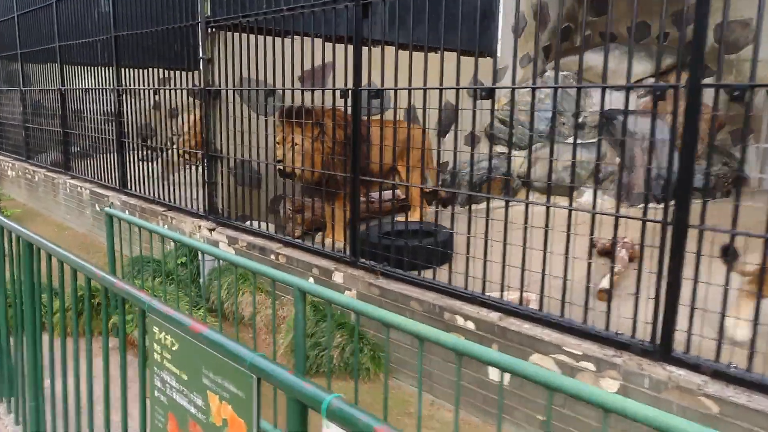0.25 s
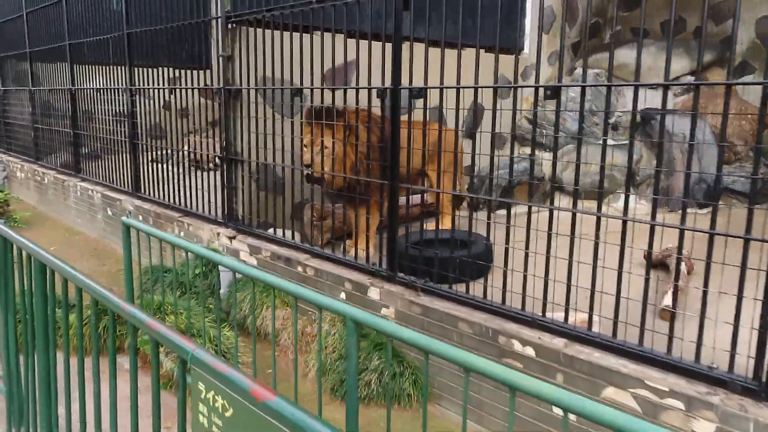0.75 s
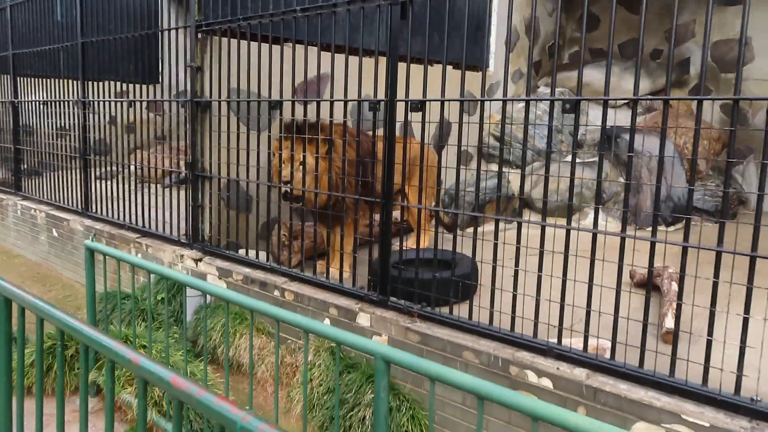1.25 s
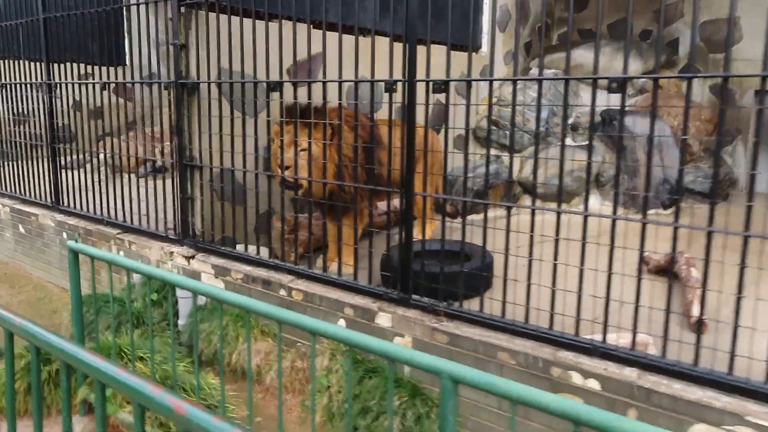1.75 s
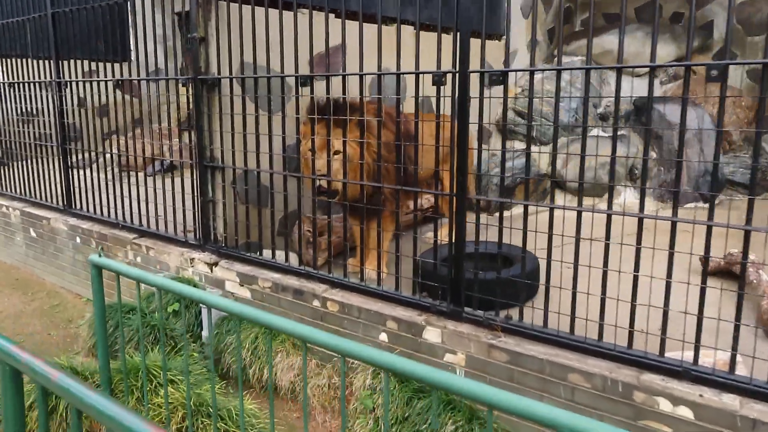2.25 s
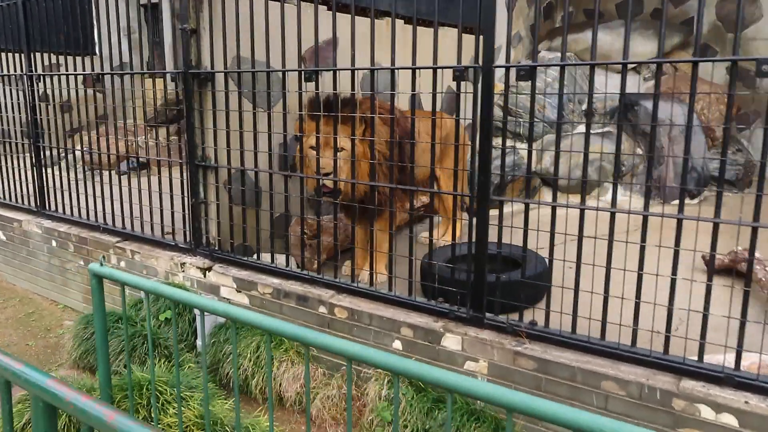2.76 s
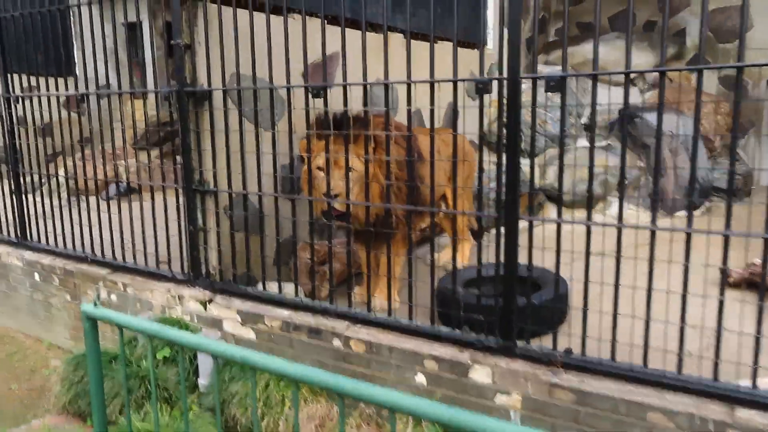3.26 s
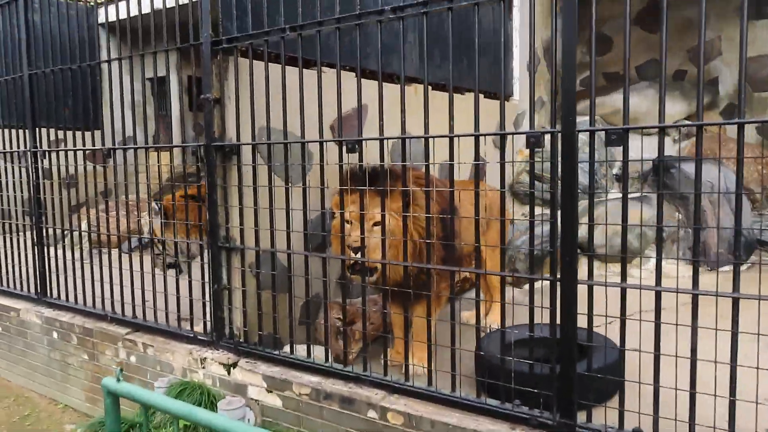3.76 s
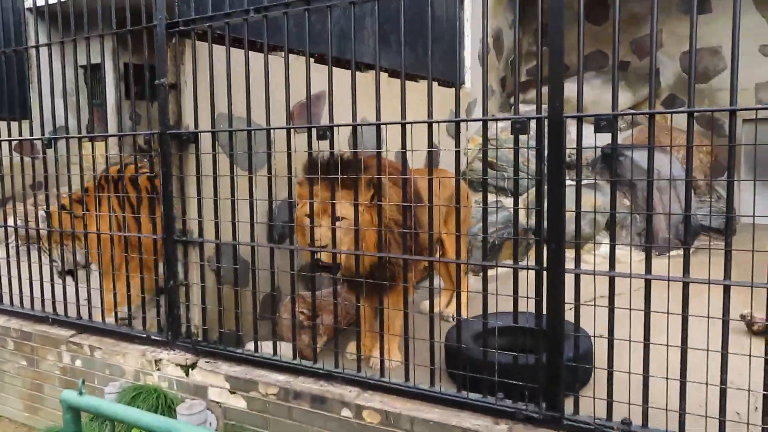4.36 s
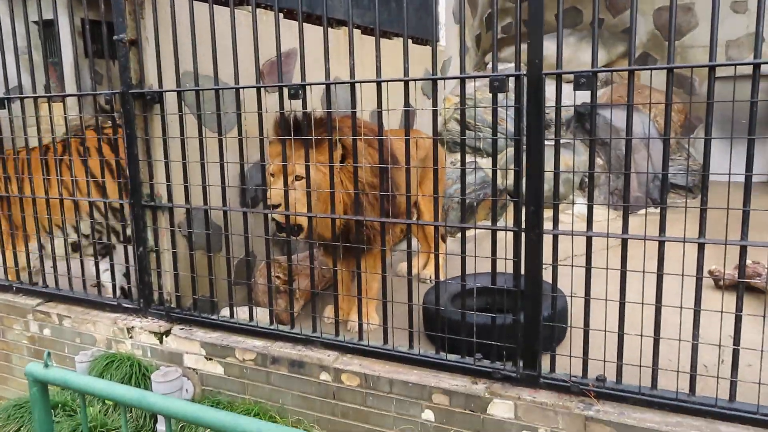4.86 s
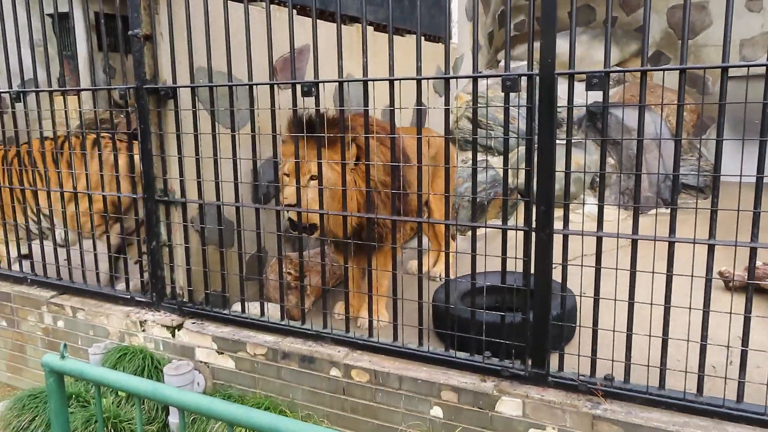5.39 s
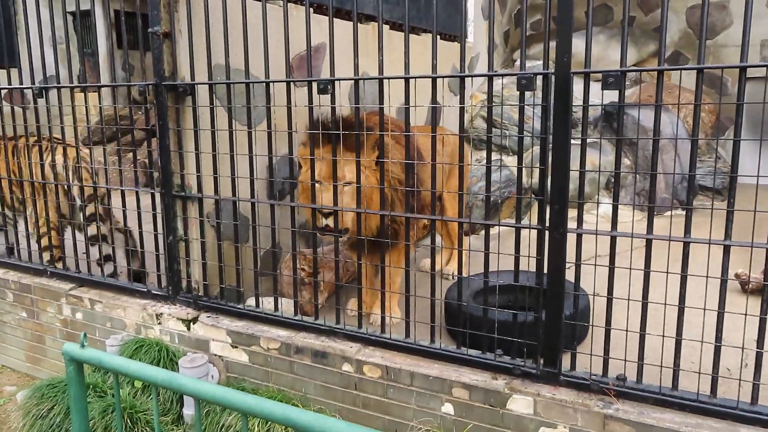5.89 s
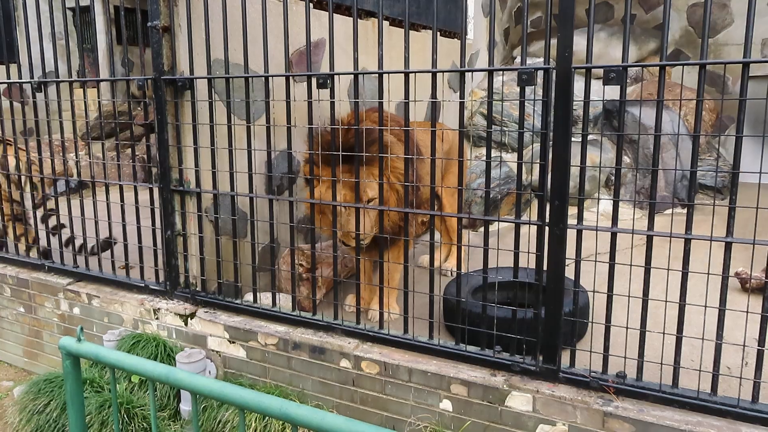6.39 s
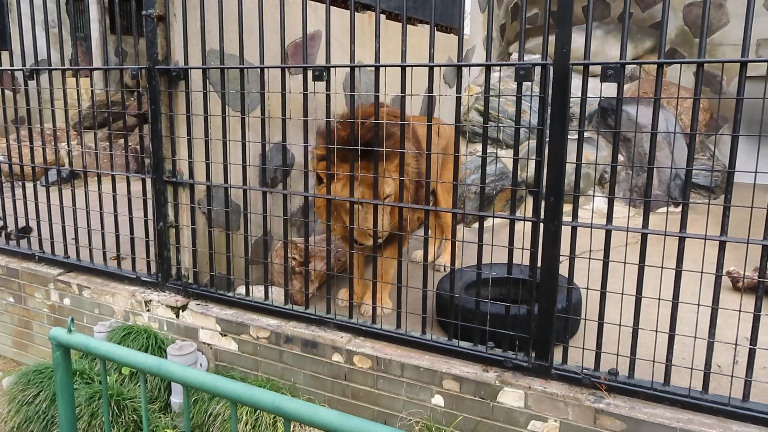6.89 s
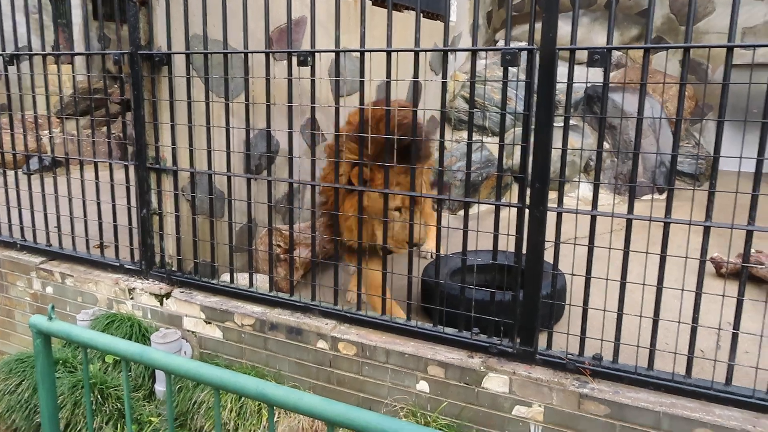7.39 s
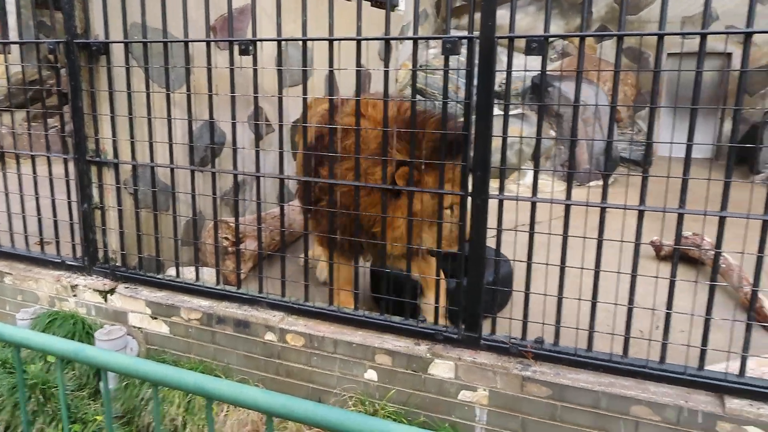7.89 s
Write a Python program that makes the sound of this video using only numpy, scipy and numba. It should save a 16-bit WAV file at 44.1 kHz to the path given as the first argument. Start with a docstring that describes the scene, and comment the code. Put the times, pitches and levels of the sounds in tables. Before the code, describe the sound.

Outdoors at a barred concrete enclosure, a big male lion sends out four separate low grunts, each swelling fast, rattling in the throat and closing in breath. Gritty footsteps scrape and tick right by the stereo microphone between the calls, strongest midway. Distant birds chirp thinly late on, and a rush of air rises over a dull urban rumble toward the end.

```python
"""As an earlier grunt dies away, a lion grunts four times in a concrete pen open to the air.
Deep fold pulses, broken up by a slower flap, ring a long throat; chest, mouth and breath sound with it.
Feet crunch on grit near the microphone: bursts of noise grains through a broad resonance over a thud.
Birds whistle far off, as noise through narrow gliding resonances.
Town rumble and a swelling rush of air, both banded noise, lie beneath."""
import sys
import numpy as np
from scipy import signal
from scipy.fft import rfft, irfft
from scipy.io import wavfile
from scipy.ndimage import uniform_filter1d
from numba import njit

SR = 44100
rng = np.random.default_rng(int(sys.argv[2]) if len(sys.argv) > 2 else 0)


def to_wav(sig):
    """Store sig (one row per channel, or 1-D mono) as 16-bit WAV at the path in sys.argv[1].

    Samples outside -1..1 are clipped; the rate is SR.
    """
    pcm = np.clip(np.atleast_2d(sig), -1, 1) * 32767
    pcm = np.round(pcm).astype(np.int16)
    wavfile.write(sys.argv[1], SR, pcm.T)  # frames by channels


N = 358841


def from_db(db):
    """Decibels to gain."""
    return 10 ** (np.asarray(db) / 20)


def rms_one(x):
    """Scale to unit rms."""
    return x / np.sqrt(np.mean(x ** 2) + 1e-20)


def at_hz(points, hz):
    """Read a spectrum on a log-frequency axis."""
    table_hz, values = np.array(points).T
    return np.interp(np.log(hz), np.log(table_hz), values)


def drift(rate_hz, size):
    """Slow random wander of rms 1: twice-smoothed noise, computed at every 40th sample."""
    r = np.exp(-80 * np.pi * rate_hz / SR)
    noise = rng.standard_normal(size // 40 + 2002)
    slow = signal.lfilter([1], [1, -2 * r, r * r], noise)[2000:]      # drop the filter's run-in
    return np.interp(np.arange(size) / 40, np.arange(len(slow)), rms_one(slow))


@njit
def resonate(x, hz, width_hz):
    """Two-pole resonance with a moving centre, gain 1 on top."""
    y, r = np.zeros(len(x)), np.exp(-np.pi * width_hz / SR)
    for i in range(2, len(x)):
        drive = (1 - r * r) / 2 * (x[i] - x[i - 2])
        y[i] = drive + 2 * r * np.cos(2 * np.pi * hz[i] / SR) * y[i - 1] - r * r * y[i - 2]
    return y


def resonate_twice(x, hz, first_width_hz, second_width_hz):
    """Two resonances in a row on one centre, fixed or gliding: steeper skirts than one."""
    centre_hz = hz + np.zeros(len(x))
    once = resonate(x, centre_hz, float(first_width_hz))
    return resonate(once, centre_hz, float(second_width_hz))


def even(x, span_s):
    """Divide out the slow level, keep the single bursts."""
    return x / np.sqrt(uniform_filter1d(x ** 2, int(span_s * SR)) + 1e-12)


def banded_noise(spectrum, patchy_db, size):
    """Half-octave bands of stereo noise, each with its own level, flicker and likeness; rms 1."""
    # how alike the two microphone ports hear the air: (f/Hz, left-right correlation)
    port_likeness = [(60, 0.99), (150, 1), (380, 0.37), (950, -0.23), (2380, 0.66), (5980, 0.16),
                     (15000, -0.3)]
    out, together = 0, drift(1.5, size=size)
    edges_hz = 20 * 2 ** np.arange(0, 10.1, .5)
    white = rng.standard_normal((2, 2, size))
    for k, (low, high) in enumerate(zip(edges_hz, edges_hz[1:])):
        hz = np.sqrt(low * high)
        if hz < spectrum[0][0] or low > spectrum[-1][0]:
            continue
        band = signal.butter(2, [low, high], "band", fs=SR, output="sos")
        mid, side = signal.sosfilt(band, white[k % 2])
        alike = np.clip(at_hz(port_likeness, hz) + (hz < 50), -1, 1)  # deepest bass is alike at both ports
        flicker_db = patchy_db * (0.91 * together + drift(28, size=size))
        gain = from_db(at_hz(spectrum, hz) + flicker_db)
        out = out + gain * (np.sqrt(1 + alike) * mid + np.sqrt(1 - alike) * side * [[1], [-1]])
    return rms_one(out)


def ports(pair, start_s):
    """Sounds that start before the microphone turns to face the pen reach the right port late."""
    # (f/Hz, left lead/radians)
    port_lead = [(0, 0), (2000, 0.37), (4480, 1.0), (6200, 1.5), (7670, 2.5), (16000, 1.5)]
    turn_s = 3.15
    size = pair.shape[1]
    hz = np.fft.rfftfreq(size, 1 / SR)
    lead = (start_s < turn_s) * np.interp(hz, *np.transpose(port_lead))
    late_right = irfft(rfft(pair[1]) * np.exp(-1j * lead), size)
    return np.array([pair[0], late_right])


def earlier_grunt():
    """The chest note of an earlier grunt still hangs in the pen: resonant noise dying away."""
    start_db, t60_s, note_hz = -34, 1, 130
    t = np.arange(N) / SR
    note = resonate_twice(rng.standard_normal(N), note_hz, 50, 82)
    return from_db(start_db - 60 * t / t60_s) * rms_one(note)


def background():
    """Town rumble and a rush of air that comes in swells, each as flickering banded noise."""
    # spectra of the town and of the moving air: (f/Hz, relative level/dB per Hz)
    rumble_spectrum = [(12, -43), (20, -19), (63, -0.5), (124, 0.5), (146, -3.5), (180, -5.5), (351, -14.5),
                       (412, -1), (474, -8.5), (735, -16.5), (1280, -20), (5000, -44), (6500, -65.5),
                       (11000, -120)]
    rush_spectrum = [(530, -33), (900, -4), (1200, 0), (1430, -2.5), (4440, -9), (7230, -16.5),
                     (13300, -27.5), (15500, -41.5)]
    # how loud the town is: (t/s, level/dB)
    rumble_level = [(0, -44.5), (.3, -51), (1.5, -46), (3.3, -43.5), (3.6, -44.5), (4.8, -43), (5.6, -38),
                    (6.5, -39.5), (8.14, -39.5)]
    # swells of the rush: (middle t/s, spread to 1/e/s, level/dB)
    rush_swells = [(3.348, 0.18, -57.5), (5.65, 0.57, -50), (7.2, 0.39, -52.5), (8.1, 0.38, -59)]
    steady_rush_db = -63
    t = np.arange(N) / SR
    rumble_gain = from_db(np.interp(t, *np.transpose(rumble_level)))
    rumble = rumble_gain * banded_noise(rumble_spectrum, 0.91, size=N)
    rush_gain = from_db(steady_rush_db)
    for middle, spread, db in rush_swells:
        rush_gain = rush_gain + from_db(db) * np.exp(-((t - middle) / spread) ** 2)
    return rumble + rush_gain * banded_noise(rush_spectrum, 0.89, size=N)


def crunches():
    """Each crunch is a run of snaps, dying sprays of grains through a broad resonance, over a soft thud."""
    # grit underfoot: (t/s, spray peak level/dB, grinding/s, thud level/dB re spray peak, centre f/Hz)
    grit_steps = [(0.383, -34, 0.0017, -4, 1250), (0.995, -46.5, 0.0018, 13, 860),
                  (1.213, -38.5, 0.0018, -15, 3800), (2.505, -42, 0.0037, -10, 960),
                  (3.032, -20, 0.011, -17, 1260), (3.058, -18.5, 0.01, -7, 1550),
                  (3.061, -37, .022, -30, 4750), (3.081, -24.5, 0.0016, -2, 1500),
                  (3.178, -40, .002, 18, 1800), (3.186, -31, .001, -30, 4400),
                  (3.187, -19, 0.0012, -18, 1250), (3.202, -36.5, .002, 12.5, 1500),
                  (3.217, -39, 0.0055, 18.5, 1980), (3.23, -36, 0.006, 6, 1930),
                  (3.402, -37.5, 0.0043, -14, 1570), (4.404, -27.5, 0.018, -7, 1640),
                  (4.419, -24, 0.0012, -1.5, 1060), (5.031, -45.5, 0.0011, -22, 4770)]
    snap_s, snap_t60_s = .012, .03      # grinding grit gives way in snaps
    thud_hz, thud_width_hz = 299, 116
    out, t = np.zeros((2, N)), np.arange(int(.15 * SR)) / SR
    thud_low_pass = signal.butter(2, 2 * thud_hz, fs=SR, output="sos")
    for s, db, grinding, thud_db, hz in grit_steps:
        # a bed of fine grains with one in a hundred far harder
        grains = rng.standard_normal(len(t)) * (0.28 + 2.94 * (rng.random(len(t)) < .01))
        repeated = from_db(-60 * (t % snap_s) / snap_t60_s)
        dying = from_db(-60 * (t - grinding) / snap_t60_s)
        snaps = np.where(t < grinding, repeated, dying)
        settling = np.sqrt(grinding / 0.11) * from_db(-60 * t / 0.4)
        grains *= snaps + settling
        spray = resonate_twice(grains, hz, .7 * hz, 1.5 * hz)
        spray = spray + .04 * grains + 1.1 * resonate(grains, 700 + 0 * t, 400.)
        spray = signal.sosfilt(signal.butter(4, 1.75 * hz, fs=SR, output="sos"), spray)
        soft_blow = rng.standard_normal(len(t)) * from_db(-60 * t / 0.028)
        thud = resonate(soft_blow, thud_hz + 0 * t, float(thud_width_hz))
        thud = signal.sosfilt(thud_low_pass, thud)
        spray, thud = spray / np.abs(spray).max(), thud / np.abs(thud).max()
        step = from_db(db) * (spray + from_db(thud_db) * thud)
        i = int(s * SR)
        out[:, i:i + len(t)] += ports(np.array([step, step]), s)
    return out


def pulse_train(cycles):
    """A one at every completed cycle."""
    return np.diff(np.floor(cycles), prepend=0) > 0


def folds(t, pitch, rough, flaps_per_s):
    """Fold pulses at the pitch of the voice; a slower flap swells them in bursts and lets turbulence flare."""
    # hardest flaps, heard as pops: (t/s, level/dB re an ordinary flap)
    hard_flaps = [(.42, -1.5), (0.444, 2.5), (0.47, 10), (0.493, 12.5), (0.516, 11), (0.545, 17),
                  (1.768, 10), (1.792, 3.5), (1.878, 10), (1.94, -1), (2.0, 2), (2.04, 2), (2.09, -0.5),
                  (3.612, -2), (3.647, 4.5), (3.682, 4), (3.709, 2.5), (3.74, 1), (3.77, 1), (3.843, 8.5),
                  (3.932, 16), (5.778, 6), (5.803, 3), (5.854, 7.5), (5.891, 6.5), (5.934, 2.5),
                  (5.96, 2.5), (5.988, 6), (6.021, 11), (6.157, 6), (6.197, 1)]
    rasp, steady_db = .25, 5      # turbulence power factor; even pulses re the ragged source
    size = len(t)
    flaps = np.cumsum(flaps_per_s * from_db(1.0 * drift(15, size=size))) / SR
    slaps = pulse_train(flaps) * from_db(rng.normal(0, 2.5, size))
    for at, db in hard_flaps:
        if t[0] < at < t[-1]:
            i, near = int((at - t[0]) * SR), int(0.017 * SR)
            slaps[i - near:i + near] = 0      # the flap needs time to close again
            slaps[i] = from_db(db)
    burst = rms_one(signal.lfilter([1], [1, -np.exp(-1 / (0.016 * SR))], slaps))
    burst = signal.lfilter([1 / 60], [1, -59 / 60], burst)      # the gap takes a moment to open
    flare = 1 - rough + rough * (burst + 0.055)
    # rough folds lose their beat
    cycles = np.cumsum(pitch * from_db(.3 * rough * drift(60, size=size))) / SR
    pulses = pulse_train(cycles) * from_db(rng.normal(0, 1.5, size) * rough)
    noise = rms_one(flare * rng.standard_normal(size))
    turbulence = np.sqrt(rasp) * (rough + 1.85) * noise
    source = rms_one(pulses * flare) + 1.68 * rough * rms_one(slaps) + turbulence
    # in the chest the flap adds a tone one flap rate above the voice, and the two beat
    hum = np.sin(2 * np.pi * cycles) + 1.36 * rough * np.sin(2 * np.pi * (cycles + flaps))
    # evenly spaced pulses, strongest where the voice clears
    steady = rms_one(np.diff(np.floor(np.cumsum(pitch) / SR), prepend=0))
    voiced = source + from_db(steady_db) * (1 - rough) * np.sqrt(flare) * steady
    return source, voiced, hum, flare


def tube(source, modes, glide, stretch):
    """Parallel gliding resonances with alternating signs, each applied twice for dark valleys."""
    out = 0
    for k, (first_hz, last_hz, width_hz, db) in enumerate(modes):
        hz = (first_hz + (last_hz - first_hz) * glide) * stretch
        out = out + (-1) ** k * from_db(db) * resonate_twice(source, hz, 0.87 * width_hz, 2.84 * width_hz)
    return out


def breathe(t, source, flare, cavities):
    """Pulses and gritty turbulence coloured by the front of the mouth; the top differs at each port."""
    # overall colour of the breath: (f/Hz, relative level/dB per Hz)
    breath_spectrum = [(1180, -26), (2000, 0.5), (2450, -8.5), (3150, -6), (4550, -9), (6140, -16),
                       (11100, -29.5), (15500, -42)]
    # moments when one cavity rings out: (start t/s, end t/s, f/Hz, gain/dB)
    cavity_rings = [(.44, 0.488, 3200, 7), (3.6, 3.644, 3300, 8), (3.814, 3.896, 2940, 9),
                    (3.91, 3.945, 4800, 10), (3.989, 4.06, 3170, 16), (5.815, 5.865, 4140, 17),
                    (6.074, 6.207, 3500, 13)]
    ring_width_hz, cavity_width_hz = 90., 150.
    flicker_db, fade_db_per_s = 5, 17      # the cavities blur as the mouth slackens
    size = len(source)
    hz = np.maximum(np.fft.rfftfreq(size, 1 / SR), 20)
    high_pass = signal.butter(1, 3000, "high", fs=SR, output="sos")
    own = signal.sosfilt(high_pass, rng.standard_normal(size))
    turbulence = rng.standard_normal(size) + .18 * own * [[1], [-1]]
    drive = 0.35 * source + flare ** 0.8 * turbulence
    jet = drive.mean(axis=0)
    for centre_hz, db in cavities:      # the cavities wander and come and go
        wander_hz = centre_hz * from_db(.12 * drift(8, size=size))
        gain = from_db(db - fade_db_per_s * (t - t[0]) + flicker_db * drift(22, size=size))
        drive += gain * resonate(jet, wander_hz, cavity_width_hz)
    for start, end, ring_hz, db in cavity_rings:
        swell = np.sin(np.pi * np.clip((t - start) / (end - start), 0, 1))
        drive += from_db(db) * resonate(swell * jet, ring_hz + 0 * t, ring_width_hz)
    return irfft(rfft(drive) * from_db(at_hz(breath_spectrum, hz)), size)


def lion_grunts():
    """Chest, throat, mouth and breath of each grunt, driven by one pair of folds."""
    # one row per grunt: (start t/s, swell time constant/s, length/s, throat level/dB, throat sag/dB per s,
    #  chest level/dB, chest growth/dB per s, mouth level/dB re throat, breath level/dB re throat,
    #  flap rate/Hz, clear from/s after start, clear for/s, left-right level/dB, mouth sag/dB per s re throat)
    grunt_rows = [(0.4, 0.064, 0.21, -11.5, 23, -15, 3.5, -4, -20.5, 42, .16, 0.13, 3.5, 6.5),
                  (1.752, 0.055, 0.34, -8, 32, -11.5, -15.5, -8.5, -21.5, 25.2, 0.08, 0.063, 3.5, 6),
                  (3.589, 0.047, 0.41, -5, 42, -13, -16, -6.5, -20.5, 28, 0.268, 0.12, 1.5, 3),
                  (5.76, 0.03, 0.48, -11, 21, -14.5, -2, -7, -20.5, 28.3, 0.27, 0.096, 2.5, -2)]
    # pitch of the voice, a list per grunt: (t/s, f/Hz)
    pitch_tracks = [
        [(.4, 123), (.53, 122), (.558, 112), (.704, 112), (.736, 106), (.8, 104)],
        [(1.75, 95), (1.796, 100), (1.864, 119.6), (1.9, 126), (1.954, 122.5), (2.04, 119.8), (2.11, 115),
         (2.3, 100)],
        [(3.59, 123), (3.684, 125.6), (3.73, 122.5), (3.78, 129), (3.842, 120.7), (3.89, 120), (3.952, 115),
         (4.03, 115), (4.14, 100)],
        [(5.76, 119), (5.9, 123), (5.955, 125.7), (5.986, 122), (6.108, 117.5), (6.146, 112), (6.19, 110.6),
         (6.27, 99), (6.4, 83)],
    ]
    # resonances of each grunt's posture, gliding as the jaw moves; tube() scales the width for each pass:
    # (first f/Hz, last f/Hz, nominal width/Hz, level/dB)
    throat_modes = [
        [(356, 348, 36, 1), (550, 490, 60, 5)],
        [(357, 335, 44, 7), (494, 480, 68, 3)],
        [(356.5, 355, 65, 4.5), (492, 515, 76, -9)],
        [(350, 355, 55, 2), (488, 511, 52, -4)],
    ]
    mouth_modes = [
        [(748, 770, 44, 3), (1010, 970, 120, 4.5), (1425, 1300, 126, -1.5), (1622, 1480, 80, -3),
         (1910, 1800, 100, -16)],
        [(717, 764, 63, 2.5), (906, 954, 77, 1), (1270, 1276, 120, 0), (1740, 1700, 140, -14)],
        [(716, 733, 39, 1.5), (1013, 1044, 117, -4.5), (1448, 1376, 130, -7.5), (1825, 1780, 71, -21.5)],
        [(709, 778, 28, 3), (1010, 1094, 91, -7), (1367, 1480, 149, -10.5), (1830, 1945, 100, -23)],
    ]
    # narrow cavities at the front of the mouth, a list per grunt: (f/Hz, gain/dB)
    mouth_cavities = [
        [(3020, 13), (3530, 1), (4130, 6), (4500, 10)],
        [(2930, 13.5), (3330, 9.5), (3850, 7), (4180, 7), (5150, 5)],
        [(2750, 6.5), (3150, 0), (3500, 5), (4250, 6), (4950, 5.5), (5550, 7.5), (6600, 3)],
        [(2720, 8.5), (3150, 10), (3600, 9.5), (4200, 6), (4950, 7.5), (5600, 7)],
    ]
    chest_hz, chest_width_hz, speaking_hz = 107.4, 74, 120.2
    swell_db, close_db_per_s, tail_s = 32, 186, .2      # the throat swells, sags, then closes
    chest_swell_db, chest_linger_s, chest_close_db_per_s = 21.5, 0.05, 167
    settled_rough, onset_rough, settle_s = .65, .25, .12      # extra roughness while the folds settle
    clear_rough, clearing_s = .15, .035      # roughness while the voice is clear; time to clear
    mouth_linger_db_per_s = 8      # the mouth resonances die slower than the throat
    # the breath thins through the grunt but outlasts the closing throat
    breath_sag_db_per_s, breath_linger_db_per_s = 5.5, 77
    chest_high_pass = signal.butter(2, chest_hz / 2, "high", fs=SR, output="sos")
    middle_band = signal.butter(2, [430, 1600], "band", fs=SR, output="sos")
    out = np.zeros((2, N))
    for row, tune, throat, mouth, cavities in zip(
            grunt_rows, pitch_tracks, throat_modes, mouth_modes, mouth_cavities):
        (start, swell, length, throat_db, sag, chest_db, growth, mouth_db, breath_db,
         flaps_per_s, clear_at, clear_for, pan_db, mouth_sag) = row
        at = np.arange(int(start * SR), int((start + length + tail_s) * SR))
        t = at / SR
        age = t - start
        closing_s = np.maximum(age - length, 0)
        chest_closing_s = np.maximum(age - length - chest_linger_s, 0)

        rise_db = -swell_db * np.exp(-np.abs(age / swell) ** 1.4)      # a soft lead-in, then a quick swell
        voice_gain = from_db(throat_db + rise_db - sag * age - close_db_per_s * closing_s)
        chest_rise_db = rise_db * chest_swell_db / swell_db
        chest_gain = from_db(chest_db + chest_rise_db + growth * age
                             - chest_close_db_per_s * chest_closing_s)
        mouth_gain = from_db(mouth_db - mouth_sag * age + mouth_linger_db_per_s * closing_s)
        breath_gain = from_db(breath_db - breath_sag_db_per_s * age + breath_linger_db_per_s * closing_s)

        pitch = np.interp(t, *np.transpose(tune))
        rough = settled_rough + onset_rough * np.exp(-age / settle_s)
        inside_clear_s = np.minimum(age - clear_at, clear_at + clear_for - age)
        clear = np.clip(1 + inside_clear_s / clearing_s, 0, 1)
        rough = rough + (clear_rough - rough) * clear
        source, voiced, hum, flare = folds(t, pitch, rough, flaps_per_s)

        chest_ring = resonate_twice(source, chest_hz, chest_width_hz, 93)
        chest = even(hum + 0.69 * even(chest_ring, 0.033), 0.068)
        chest = signal.sosfilt(chest_high_pass, chest)
        # a sinking larynx lowers pitch and the first throat resonance together
        larynx = (pitch / speaking_hz) ** .7
        jaw = np.minimum(age / length, 1.25) ** 2.46      # the jaw moves most towards the end
        throat_ring = tube(voiced, throat[:1], jaw, larynx) - tube(voiced, throat[1:], jaw, 1)
        low = chest_gain * chest + voice_gain * even(throat_ring, 0.085)
        upper = voice_gain * mouth_gain * even(tube(voiced, mouth, jaw, 0.99), 0.077)
        air = voice_gain * breath_gain * even(breathe(t, source, flare, cavities), 0.11)

        fade = np.clip(np.minimum(age, t[-1] - t) / 0.05, 0, 1)
        middle = signal.sosfiltfilt(middle_band, low + upper)
        # the middle range leans to the left, or to the right where the table is negative
        lean = from_db([[pan_db / 2], [-pan_db / 2]]) - 1
        out[:, at] += ports(fade * (low + upper + air + lean * middle), start)
    return out


def whistles():
    """Wavering far tones: noise through a narrow gliding resonance."""
    # birds far off: (start t/s, end t/s, first f/Hz, last f/Hz, rms level/dB before fades, waver width/Hz)
    bird_calls = [(.8, 1.4, 4950, 5060, -70.5, 190), (5.08, 5.3, 4050, 4350, -66, 120),
                  (5.3, 5.76, 4300, 4700, -64, 130), (5.27, 5.42, 3690, 3770, -60, 90),
                  (6.6, 6.71, 3500, 3700, -55.5, 70), (6.7, 6.95, 3650, 3560, -61, 110),
                  (6.69, 6.92, 3950, 3950, -59, 130), (6.82, 6.89, 2950, 3180, -59, 90),
                  (6.73, 6.8, 2080, 1880, -59, 150), (6.83, 6.89, 2170, 2020, -59, 110)]
    out = np.zeros(N)
    for start, end, first_hz, last_hz, db, waver_hz in bird_calls:
        at = np.arange(int(start * SR), int(end * SR))
        hz = np.linspace(first_hz, last_hz, len(at))
        tone = resonate_twice(rng.standard_normal(len(at)), hz, waver_hz, 2 * waver_hz)
        fade = np.hanning(len(at)) ** (1 / 3)
        flicker = from_db(2.0 * drift(45, size=len(at)))
        out[at] += from_db(db) * rms_one(tone) * fade * flicker
    return out


def pen(x):
    """Echo of the concrete: eight feedback delays a side, duller on every round."""
    t60_s, cut_hz, bass_hz = 0.65, 2100, 80
    x = signal.lfilter(*signal.butter(1, bass_hz, "high", fs=SR), x)      # the open roof lets the bass out
    out, dull = np.zeros((2, N)), np.exp(-2 * np.pi * cut_hz / SR)
    lags = (rng.uniform(.025, .06, 16) * SR).astype(int)
    for k, lag in enumerate(lags):
        loop, state = x + 1e-18, [0.]
        gain = from_db(-60 * lag / SR / t60_s)
        for i in range(lag, N, lag):
            back, state = signal.lfilter([gain * (1 - dull)], [1, -dull], loop[i - lag:i], zi=state)
            loop[i:i + lag] += back[:N - i]
        out[k % 2] += (loop - x) * (-1) ** (k // 2)
    # close ports share the bass
    side = signal.sosfilt(signal.butter(2, 900, "high", fs=SR, output="sos"), out[1])
    return out[0] + .5 * side * [[1], [-1]]


def scene():
    """The lion in its pen, the small sounds and the air."""
    pen_db, far_send, grit_send = -19.5, 7.1, 1.2      # echo level; gains of birds and grit into the pen
    lion, far, grit = lion_grunts(), whistles(), crunches()
    echo = pen(lion.mean(axis=0) + far_send * far + grit_send * grit[0])
    return lion + from_db(pen_db) * echo + grit + far + background() + earlier_grunt()


def record(dry):
    """Peaks are rounded at full scale, the top is cut."""
    cutoff_hz = 15650      # 60 dB down from here up
    held = dry / (1 + np.abs(dry) ** 6) ** (1 / 6)
    return signal.sosfilt(signal.cheby2(20, 60, cutoff_hz, fs=SR, output="sos"), held)


dry = scene()
out = record(dry)
to_wav(out)
```